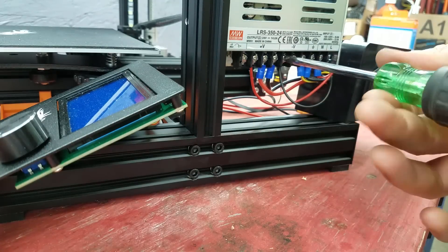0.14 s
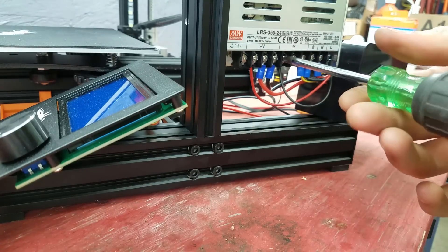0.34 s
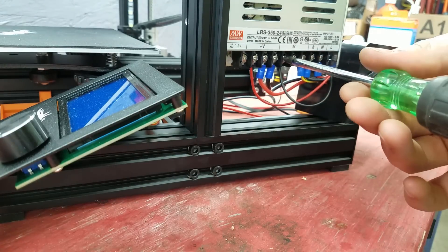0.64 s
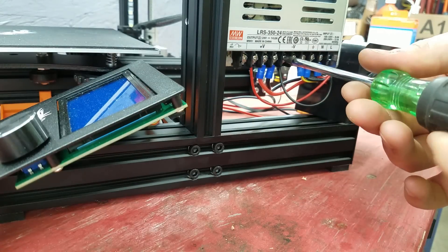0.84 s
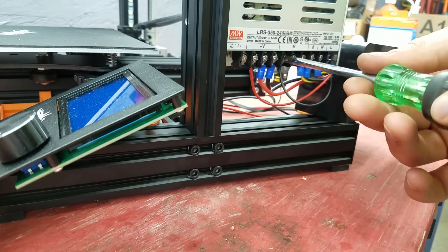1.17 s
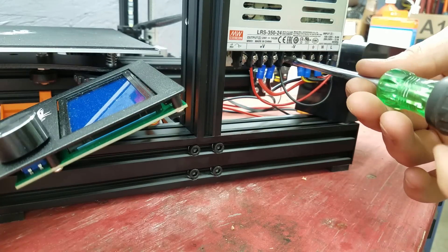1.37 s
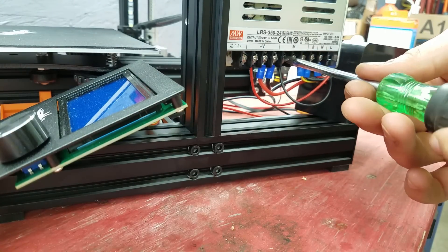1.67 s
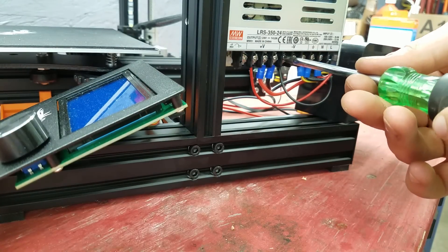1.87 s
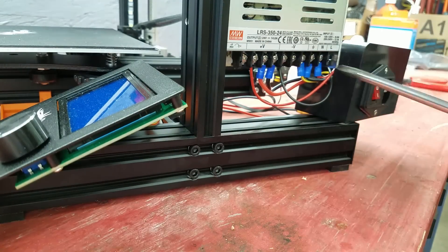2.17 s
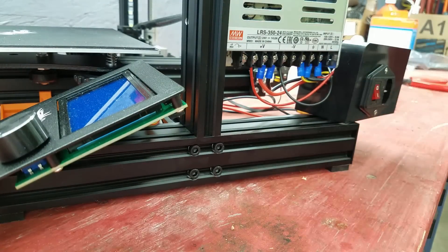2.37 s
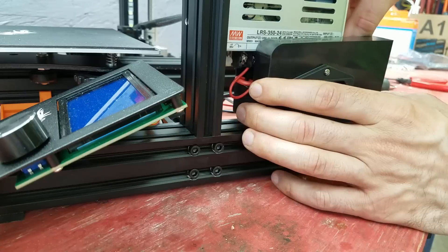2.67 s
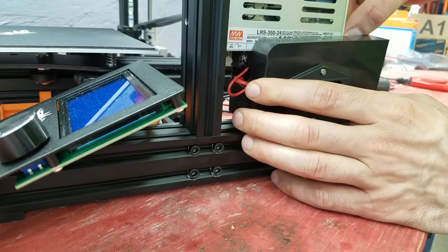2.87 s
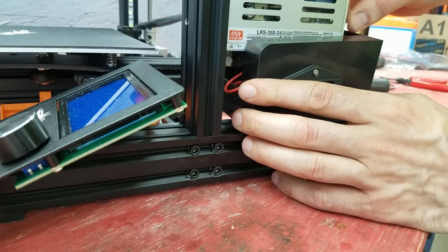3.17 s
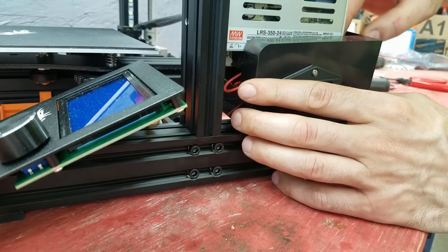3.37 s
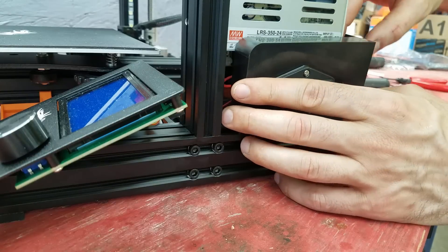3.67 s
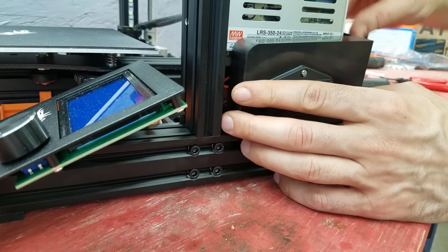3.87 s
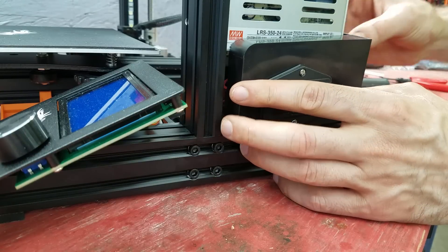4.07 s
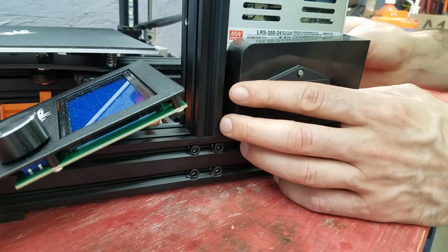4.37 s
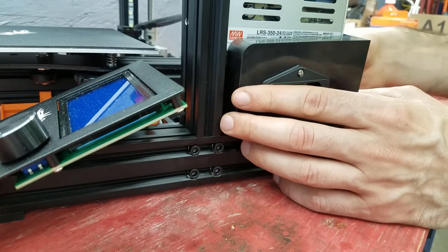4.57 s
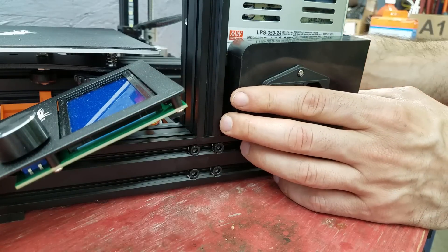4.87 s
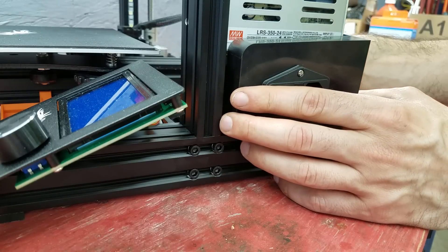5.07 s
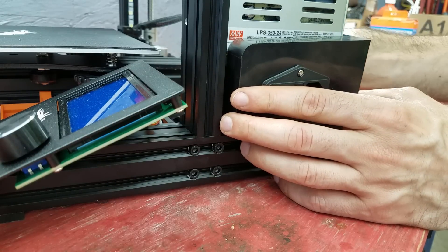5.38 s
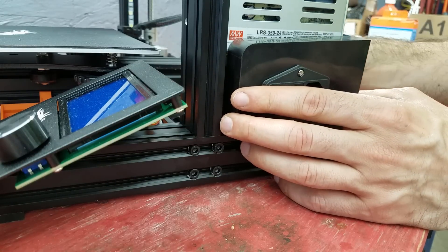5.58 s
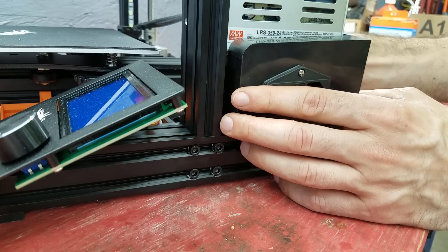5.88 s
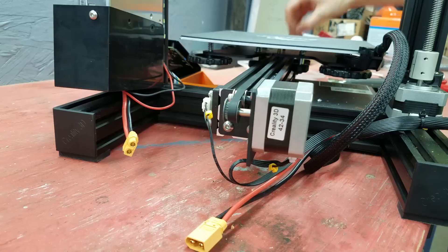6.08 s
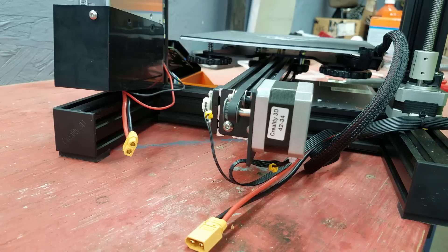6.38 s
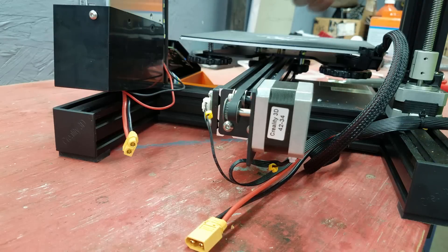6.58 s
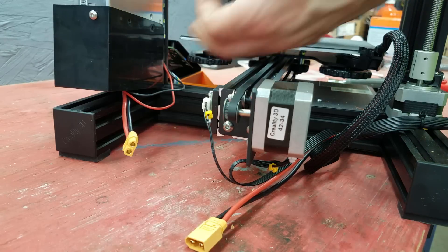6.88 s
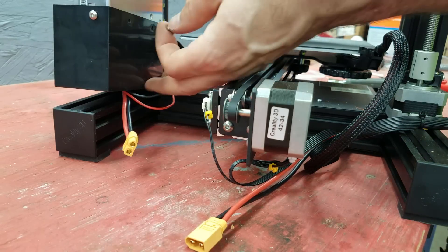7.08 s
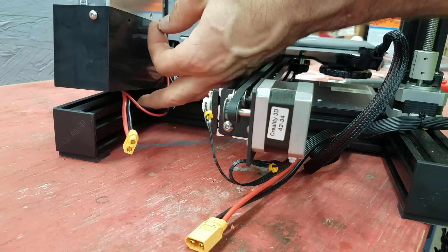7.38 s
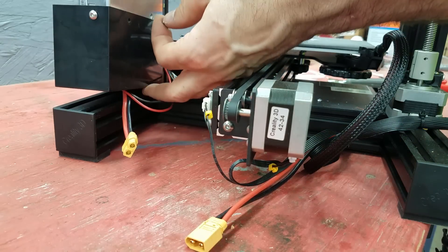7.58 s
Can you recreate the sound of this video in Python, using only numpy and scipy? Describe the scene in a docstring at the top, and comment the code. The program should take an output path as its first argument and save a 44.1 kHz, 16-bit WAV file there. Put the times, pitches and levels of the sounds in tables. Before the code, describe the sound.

In a small, slightly reverberant workshop, a screwdriver tip lightly taps screw terminals. After a soft hand rustle, a hollow plastic cover scrapes with a tiny squeak and clunks into place over several knocks, then only faint ticks and rubbing. Dull metal frame knocks follow, a small steel part drops and bounces brightly, and a harder knock shakes the bench. Close microphone, faint hiss.

```python
"""Close work on a 3D printer's power supply in a small workshop, over faint microphone hiss.
First a screwdriver tip taps the screw terminals: damped modes and a small thud. Then hands rub (shaped noise)
and a plastic cover is scraped, with a short squeak (gliding tone), and knocked into place (hollow modes).
Next come frame knocks (dense metal ringing, bench boom), while a small steel part drops and bounces
(thin high modes). A last hard knock shakes the frame and the bench."""
import sys
import numpy as np
from scipy import signal
from scipy.fft import rfft, irfft, next_fast_len
from scipy.io import wavfile

SR = 44100
rng = np.random.default_rng(int(sys.argv[2]) if len(sys.argv) > 2 else 0)


def bounce(signal):
    """Save signal as a 16-bit WAV file at the path given by the first command-line argument."""
    frames = np.transpose(np.atleast_2d(signal))
    limited = np.clip(frames, -1, 1)
    pcm = np.round(limited * 32767).astype(np.int16)
    wavfile.write(sys.argv[1], SR, pcm)


N = 340893
TIME_S = np.arange(N) / SR
AGE_S = TIME_S[:SR * 3 // 5]  # time since a touch

# Strength: how loud the body rings. Hardness: crack over that ring.
# Push: weight of the hand behind the touch, which sets its thump.
# Cover on the case. Each row: start in seconds, ring in Hz, strength, hardness and push in dB.
COVER_TOUCHES = [(2.662, 1010, -33, -1, -43), (2.76, 1110, -47.5, -5, -63), (3.141, 1130, -39.5, -9, -37),
                 (3.432, 1140, -52, -17.5, -51), (3.551, 1003, -22.5, -23, -32),
                 (3.802, 1210, -33, -21, -51.5), (4.526, 1450, -43.5, -4, -52), (4.659, 1560, -65, -1, -70),
                 (4.918, 870, -59.5, -10.5, -66), (5.106, 1330, -54, -9, -61.5),
                 (5.485, 1080, -57.5, -10, -64), (5.901, 1050, -48, -15.5, -57)]
# Low modes of the hollow cover. Each row: frequency in Hz, relative level in dB, t60 in seconds.
COVER_MODES = [(177.2, -2.5, 0.21), (273.5, -8, 0.33), (414, 1.5, 0.14), (454, 0.5, 0.24), (503, -8, 0.22)]
# Knocks on the frame. Each row: start in seconds, ring in Hz, thump in Hz, strength, hardness and push in dB.
FRAME_KNOCKS = [(6.483, 744, 215, -50.5, -13.5, -55.5), (6.568, 1600, 254.5, -45, -12.5, -57),
                (6.6, 1586, 139.6, -38, -4, -47.5), (7.146, 870, 190, -48, -19, -42),
                (7.28, 730, 146, -57.5, -13, -52), (7.354, 1224, 121.2, -18.5, -6, -27)]
# Dense ringing of frame and sheet metal. Each row: frequency in Hz, relative density in dB per Hz.
FRAME_SPECTRUM = [(290, -67), (500, -18), (599, -23), (690, -7), (760, -20), (803, -4), (1240, 10),
                  (1480, 1), (1990, 11), (2850, -11), (3190, -1), (3940, -20), (7900, -14), (9740, -44),
                  (14000, -25)]
# Screwdriver on the terminals. Each row: start in seconds, ring in Hz, strength, hardness and push in dB.
TAPS = [(.109, 850, -65.5, 8, -78), (0.32, 740, -42, -35, -54.5), (.544, 902, -54, -31, -58.5),
        (0.941, 726, -40.5, -28.5, -57.5), (1.063, 930, -65.5, -11, -63.5),
        (1.696, 1086, -46.5, -13, -62.5)]

# Separate scrapes of plastic and metal, from a brief tick to a short stroke.
# Each row: start in seconds, length in seconds, rasp in dB, grit in dB.
SCRAPES = [(1.678, 0.0087, -61, -65), (2.491, 0.098, -47, -73), (2.601, 0.042, -45.5, -61),
           (2.961, 0.013, -59.5, -78), (3.117, 0.086, -51.5, -76), (4.351, 0.053, -56.5, -70),
           (4.704, 0.046, -66, -75.5), (5.03, 0.052, -62, -75.5), (5.331, .03, -66, -74),
           (5.621, 0.19, -67.5, -83), (6.486, 0.0051, -55.5, -66), (7.134, 0.009, -53, -61.5)]
# Squeak track. Each row: time in seconds, pitch in Hz, level in dB.
SQUEAK = [(2.49, 635, -90), (2.495, 626, -43.5), (2.52, 693, -45), (2.535, 694, -39.5), (2.56, 664, -51),
          (2.58, 640, -70)]
# Colour of the plastic rasp. Each row: frequency in Hz, relative density in dB per Hz.
PLASTIC_SPECTRUM = [(50, -31), (125, -6), (310, -3), (500, -5.5), (690, -3.5), (830, -7.5), (1020, -1.5),
                    (1250, -9), (1410, -7), (1590, -13), (1780, -8.5), (1950, -11.5), (2290, -26.5),
                    (4000, -30.5), (9000, -46.5)]
SCRAPE_ATTACK_S, SCRAPE_RELEASE_S = 0.0018, 0.0087  # a scrape catches at once, lets go more slowly
GRAZE_DB, GRAZE_S = -18.5, 0.0054  # graze before a touch: level against strength, rise time
SLIDE_DB, SLIDE_S = -11, 0.015  # slide after it: level against push, fade time
SLIDE_GRIT_DB = -13  # grit against rasp in graze and slide
STUTTER_DB = 1.7  # uneven grip

# Small steel part. Each row: start in seconds, strength in dB, push in dB.
BOUNCES = [(6.7793, -33, -36), (6.821, -36, -38.5), (6.827, -42.5, -58), (6.85, -41.5, -47),
           (6.861, -42, -43.5)]
BOUNCE_HZ, BOUNCE_HARDNESS_DB = 1570, 10.5
# Modes of the steel part. Each row: frequency in Hz, relative level in dB, t60 in seconds.
STEEL_MODES = [(8900, -21, .25), (13900, -2, 0.32), (14717, -9, 0.21)]
# Modes of the bench. Each row: frequency in Hz, relative level in dB, t60 in seconds.
BENCH_MODES = [(118.5, -2, 0.32), (176, 3.5, 0.086), (262.6, -1.5, 0.21), (560, -4, 0.088),
               (630, -8.5, 0.13)]

# Skin and sleeve moves. Each row: peak time in seconds, half-length in seconds, level in dB, left-right in dB.
MOVES = [(2.082, 0.029, -67.5, -2), (2.19, 0.045, -61.5, -3), (2.566, 0.34, -64, -2),
         (3.15, 0.085, -63, 0.5), (4.7, 0.31, -75.5, 1), (5.35, .09, -70, 2), (5.745, 0.38, -72, 2),
         (6.103, 0.089, -63, -3.5), (7.5, 0.94, -68, 0)]
HOLD_DB = -73.5  # faint rub of hands that only hold
# Colour of skin on parts. Each row: frequency in Hz, relative density in dB per Hz.
SKIN_SPECTRUM = [(150, -19.5), (250, -4.5), (559, -8), (620, -6), (687, -6.5), (1790, -11.5), (4300, -13.5),
                 (9610, -21.5), (15000, -13)]

# Colour of the background noise. Each row: frequency in Hz, relative density in dB per Hz.
HISS_SPECTRUM = [(12, -47), (20, -4), (27, -18.5), (81, -2), (107, -5), (328, -13.5), (357, -16.5),
                 (399, -12.5), (472, -11), (574, -18), (923, -18), (1000, -21), (1760, -21.5), (7730, -41),
                 (16000, -27.5)]
# Its stereo width. Each row: frequency in Hz, side over mid in dB.
HISS_WIDTH = [(60, -10), (110, -5), (200, -1), (380, -1.5), (700, -0.5), (1290, 1.5), (2380, 1.5),
              (4400, 1), (8120, 2), (15000, 3)]
# Stereo width of all other sources. Each row: frequency in Hz, side over mid in dB.
WIDTH = [(100, -19), (300, -10.5), (700, -7.5), (1200, -5.5), (2000, -1.5), (4000, 0.5), (14000, -1.5)]
# Workshop reverberation. Each row: frequency in Hz, t60 in seconds.
ROOM_T60 = [(100, 0.51), (400, 0.61), (1200, 0.58), (2500, 0.66), (6000, 0.67), (10000, 0.39),
            (15000, 0.51)]
TOP_HZ = 15950


def amp(db):
    """Decibels to gain."""
    return 10 ** (np.asarray(db) / 20)


def unit(x):
    """Scale to rms 1."""
    return x / np.sqrt(np.mean(x ** 2) + 1e-20)


def pulse(x):
    """Scale a transient to the energy of 10 ms at rms 1."""
    return unit(x) * np.sqrt(0.01 * SR / x.shape[-1])


def along(points, hz):
    """Interpolate (Hz, value) points on a log frequency axis."""
    f, v = np.transpose(points)
    return np.interp(np.log(hz + 1), np.log(f + 1), v)


def filtered(x, response):
    """Multiply the spectrum of x by a response of frequency."""
    size = x.shape[-1]
    m = next_fast_len(size + 8192)  # padding limits wrap-around
    return irfft(rfft(x, m) * response(np.fft.rfftfreq(m, 1 / SR)), m)[..., :size]


def band(x, lo_hz, hi_hz, order=2):
    """Causal Butterworth band-pass."""
    edges_hz = [lo_hz, min(hi_hz, SR / 2 - 100)]
    return signal.sosfilt(signal.butter(order, edges_hz, 'band', fs=SR, output='sos'), x)


def spread(pair, width):
    """Mid and side rows become left and right, side weighted by frequency."""
    mid, side = filtered(pair, lambda hz: np.array([np.ones_like(hz), amp(along(width, hz))]))
    return np.array([mid + side, mid - side])


def noise(spectrum, width):
    """Coloured stereo noise of rms 1."""
    coloured = filtered(rng.standard_normal((2, N)), lambda hz: amp(along(spectrum, hz)))
    return unit(spread(coloured, width))


def add(track, start_s, x):
    """Mix x into the track at start_s."""
    part = track[:, round(start_s * SR):][:, :x.shape[-1]]
    part += x[:, :part.shape[-1]]


def burst(t60_s, lo_hz, hi_hz, order=2, attack_s=0.00062):
    """Dense modes of one band, struck together: decaying filtered noise."""
    shape = amp(-60 * AGE_S / t60_s) * (1 - np.exp(-AGE_S / attack_s))
    pair = band(rng.standard_normal((2, len(AGE_S))) * shape, lo_hz, hi_hz, order)
    return np.array([pulse(row) for row in pair])


def ring(modes, attack_s):
    """Separate decaying modes; rows a quarter cycle apart, so neither side is favoured."""
    tones = 0
    for hz, db, t60_s in modes:
        turns = hz * AGE_S + np.array([[0], [-0.25]]) + rng.random()
        tones = tones + amp(db - 60 * AGE_S / t60_s) * np.sin(2 * np.pi * turns)
    return pulse(tones * (1 - np.exp(-AGE_S / attack_s)))


def contact(hz, strength_db, hardness_db, snap_db, ring_t60_s, dense_db, body_t60_s, edge_t60_s, attack_s):
    """One touch: damped main resonance, dense modes around it, sharp crack of the surfaces."""
    body = amp(-3.0) * ring([(hz, 0, ring_t60_s)], attack_s)
    body = body + amp(dense_db) * burst(body_t60_s, 680, 1770, order=3, attack_s=attack_s)
    crack = burst(edge_t60_s, 1200, 3700, attack_s=attack_s)
    crack = crack + amp(snap_db) * burst(edge_t60_s, 2500, 20000, attack_s=attack_s)
    return amp(strength_db) * (body + amp(hardness_db) * crack)


def cover():
    """Hollow plastic cover: quickly damped ring and a longer low thunk."""
    out = np.zeros((2, N))
    for start_s, hz, strength_db, hardness_db, push_db in COVER_TOUCHES:
        knock = contact(hz, strength_db, hardness_db, snap_db=-7.0, ring_t60_s=0.011, dense_db=-7.5,
                        body_t60_s=0.02, edge_t60_s=0.019, attack_s=0.00061)
        thunk = amp(-3.5) * burst(0.14, 90, 740) + amp(-3.5) * ring(COVER_MODES, attack_s=0.0015)
        add(out, start_s, knock + amp(push_db) * thunk)
    return out


def frame():
    """Knocks ring the metal frame in countless close modes and make the bench boom."""
    bark_modes = [(725, -17.0, 0.099), (1110, -4, 0.012), (1867, 3.5, 0.021), (2300, 0.5, 0.025)]
    out = np.zeros((2, N))
    for start_s, hz, thump_hz, strength_db, hardness_db, push_db in FRAME_KNOCKS:
        knock = contact(hz, strength_db, hardness_db, snap_db=-18, ring_t60_s=0.015, dense_db=-9.0,
                        body_t60_s=0.015, edge_t60_s=0.017, attack_s=0.002)
        # strongest sheet-metal modes, shorter than the dense ringing
        bark = amp(strength_db - 9.0) * ring(bark_modes, attack_s=0.0044)
        metal = filtered(rng.standard_normal((2, len(AGE_S))), lambda f: amp(along(FRAME_SPECTRUM, f)))
        ringing = amp(strength_db - 15.0) * pulse(metal * amp(-60 * AGE_S / 0.86))
        boom = ring([(thump_hz, 0, 0.18)], attack_s=0.02)
        boom = boom + amp(-2.5) * burst(0.21, 80, 260, order=3, attack_s=0.0054)
        add(out, start_s, knock + bark + ringing + amp(push_db) * boom)
    return out


def screwdriver():
    """The tip meets the terminal block, whose modes clack and pass a small thud to the frame."""
    clack_modes = [(950, -7.5, 0.017), (1465, -18.5, 0.024), (2030, -11.0, 0.0085), (2520, -10, 0.0072)]
    out = np.zeros((2, N))
    for start_s, hz, strength_db, hardness_db, push_db in TAPS:
        tap = contact(hz, strength_db, hardness_db, snap_db=-9.5, ring_t60_s=0.03, dense_db=-18.0,
                      body_t60_s=0.039, edge_t60_s=0.01, attack_s=0.0051)
        clack = amp(strength_db - 8) * ring(clack_modes, attack_s=0.0019)
        thud = amp(push_db + 2.5) * burst(0.23, 93, 330)
        add(out, start_s, tap + clack + thud)
    return out


def sliding():
    """Gains of rasp and grit: separate scrapes, plus moments around each tap and cover touch."""
    power = np.zeros((2, N))
    for start_s, length_s, rasp_db, grit_db in SCRAPES:
        rise = np.clip((TIME_S - start_s) / SCRAPE_ATTACK_S, 0, 1)
        fall = np.exp(-np.maximum(TIME_S - start_s - length_s, 0) / SCRAPE_RELEASE_S)
        power += amp([[rasp_db], [grit_db]]) ** 2 * rise * fall
    for start_s, _, strength_db, _, push_db in TAPS + COVER_TOUCHES:
        gap_s = np.abs(TIME_S - start_s)
        graze = amp(strength_db + GRAZE_DB) ** 2 * np.exp(-gap_s / GRAZE_S)
        slide = amp(push_db + SLIDE_DB) ** 2 * np.exp(-gap_s / SLIDE_S)
        brief = np.where(TIME_S < start_s, graze, slide)
        power += np.array([brief, amp(SLIDE_GRIT_DB) ** 2 * brief])
    return np.sqrt(power)


def squeak():
    """Stick-slip squeak: one gliding tone with jittered pitch."""
    time_s, hz, db = np.transpose(SQUEAK)
    jitter = 1 + 0.027 * unit(band(rng.standard_normal(N), 17, 200))
    phase = 2 * np.pi * np.cumsum(np.interp(TIME_S, time_s, hz) * jitter) / SR
    return np.interp(TIME_S, time_s, amp(db), left=0, right=0) * np.sin(phase)


def scrapes():
    """Plastic sticks and slips in tiny grains: noise of uneven level, as rasp and brighter grit."""
    slips = rng.standard_normal((2, N))
    grain_db = 2.6 * unit(band(rng.standard_normal(N), 110, 780))
    stutter_db = STUTTER_DB * unit(band(rng.standard_normal(N), 25, 90))
    slips = slips * amp(grain_db + stutter_db)
    rasp = unit(filtered(slips, lambda hz: amp(along(PLASTIC_SPECTRUM, hz))))
    grit = unit(band(slips, 1500, 3200, order=1))
    rasp_gain, grit_gain = sliding()
    return rasp_gain * rasp + grit_gain * grit + np.array([squeak(), np.zeros(N)])  # squeak in mid only


def steel_part():
    """Each bounce excites thin high steel modes and the bench; the first has an extra crack."""
    out = np.zeros((2, N))
    for start_s, strength_db, push_db in BOUNCES:
        hit = contact(BOUNCE_HZ, strength_db - BOUNCE_HARDNESS_DB, BOUNCE_HARDNESS_DB, snap_db=-2.0,
                      ring_t60_s=0.021, dense_db=-3.5, body_t60_s=0.06, edge_t60_s=0.047, attack_s=0.0005)
        steel = amp(strength_db - 20) * ring(STEEL_MODES, attack_s=0.0005)
        bench = ring(BENCH_MODES, attack_s=0.0073) + amp(-12.5) * burst(0.2, 130, 1030)
        add(out, start_s, hit + steel + amp(push_db) * bench)
    landing = amp(-29.5) * burst(0.018, 5000, 6400, order=1) + amp(-38) * ring(STEEL_MODES, attack_s=0.0003)
    add(out, BOUNCES[0][0], landing)
    return out


def brushing():
    """Hands slide softly over the parts with uneven pressure: shaped noise."""
    power = np.full((2, N), amp(HOLD_DB) ** 2)
    for peak_s, half_length_s, db, pan_db in MOVES:
        swell = np.exp(-((TIME_S - peak_s) / half_length_s) ** 2)
        power += amp([[db + pan_db / 2], [db - pan_db / 2]]) ** 2 * swell
    pressure_db = 0.84 * unit(band(rng.standard_normal(N), 10, 39.2))
    catch_db = 1.27 * unit(band(rng.standard_normal(N), 60, 400))  # skin catches and lets go
    return np.sqrt(power) * amp(pressure_db + catch_db) * noise(SKIN_SPECTRUM, WIDTH)


def microphone_hiss():
    """Steady coloured background noise."""
    return amp(-66.0) * noise(HISS_SPECTRUM, HISS_WIDTH)


def room(x, near_db, tail_db):
    """Direct sound, quick reflections off bench and machine, and the workshop's tail."""
    hz, t_s, z = signal.stft(rng.standard_normal((2, len(AGE_S))), SR, nperseg=256)
    decay = amp(-60 * t_s / along(ROOM_T60, hz)[:, None])
    tail = signal.istft(z * decay, SR, nperseg=256)[1][:, :len(AGE_S)]
    tail = tail * (1 - np.exp(-AGE_S / 0.004))
    near = rng.standard_normal(tail.shape) * amp(-60 * AGE_S / 0.049) * (AGE_S > 0.003)
    answer = amp(near_db) * near / np.linalg.norm(near[0])
    answer = answer + amp(tail_db) * tail / np.linalg.norm(tail[0])
    return x + signal.fftconvolve(x, answer, axes=1)[:, :N]


def place(pair, lead_s, pan_db):
    """A source off to one side arrives there sooner and louder; positive is left."""
    sides = np.array([[0.5], [-0.5]])
    return filtered(pair, lambda hz: amp(pan_db * sides) * np.exp(2j * np.pi * hz * lead_s * sides))


def scene():
    """Each group of sources stirs the room in its own measure; brushing and hiss stay dry."""
    close = spread(room(screwdriver() + cover() + scrapes(), near_db=-8.5, tail_db=-15.5), WIDTH)
    knocks = spread(room(frame(), near_db=-7, tail_db=-12.5), WIDTH)
    knocks = place(knocks, lead_s=0.00025, pan_db=1.0)
    clatter = spread(room(steel_part(), near_db=-19.0, tail_db=-9.0), WIDTH)
    clatter = place(clatter, lead_s=-0.000141, pan_db=-0.5)
    return close + knocks + clatter + brushing() + microphone_hiss()


def record(dry):
    """Steep low-pass at the recorder's band limit."""
    return filtered(dry, lambda hz: 1 / np.sqrt(1 + (hz / TOP_HZ) ** 240))


dry = scene()
out = record(dry)
bounce(out)
```